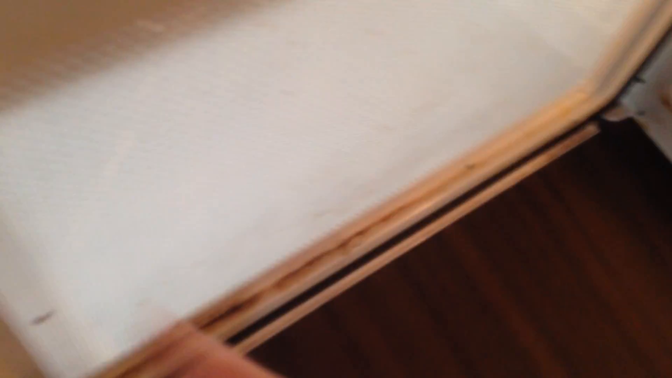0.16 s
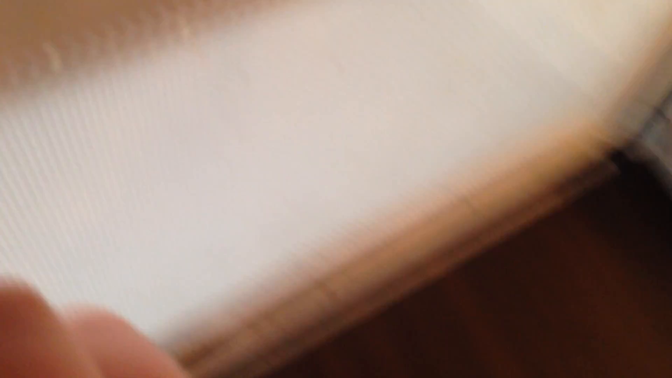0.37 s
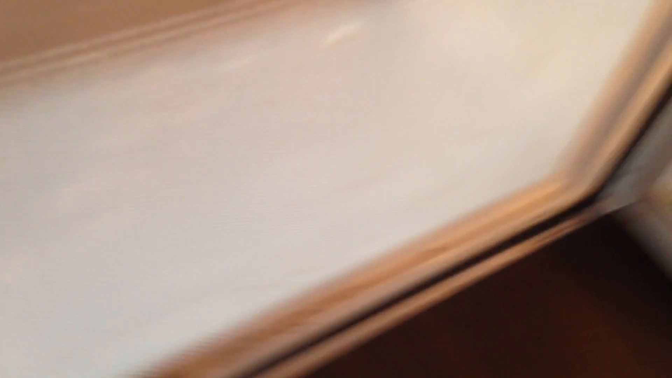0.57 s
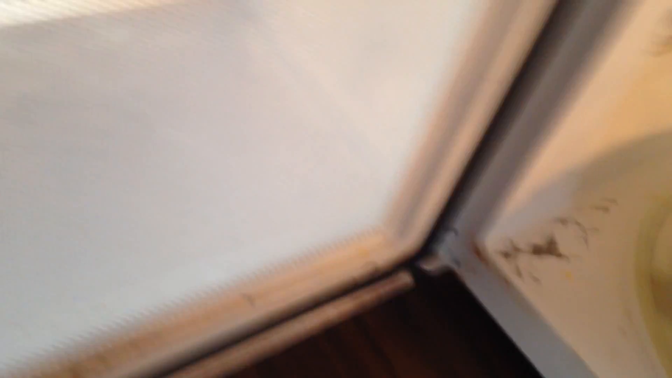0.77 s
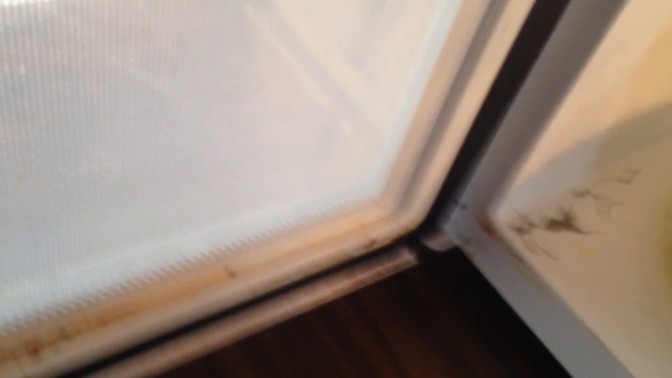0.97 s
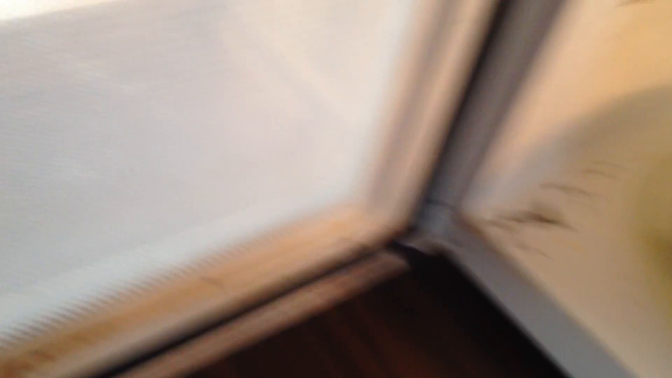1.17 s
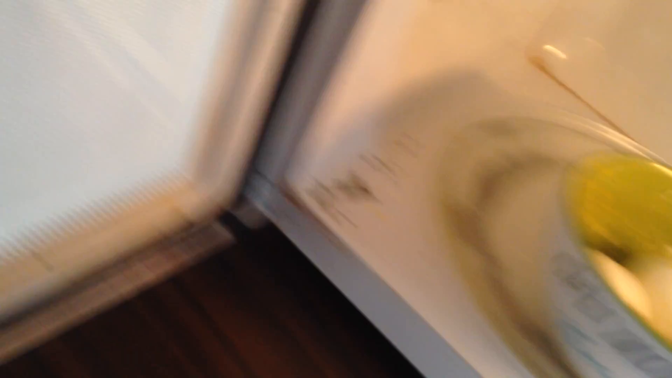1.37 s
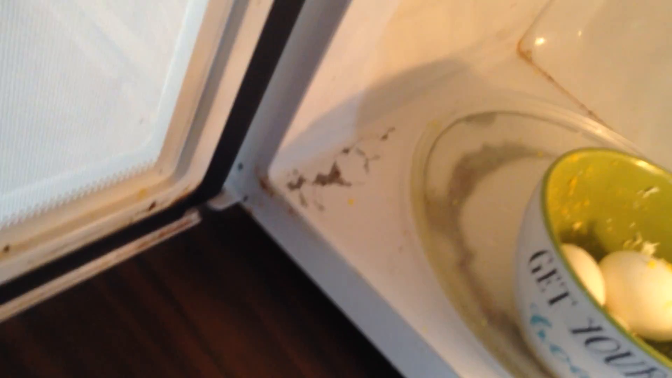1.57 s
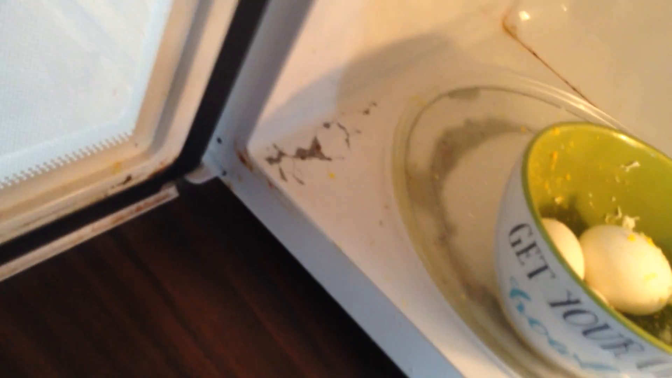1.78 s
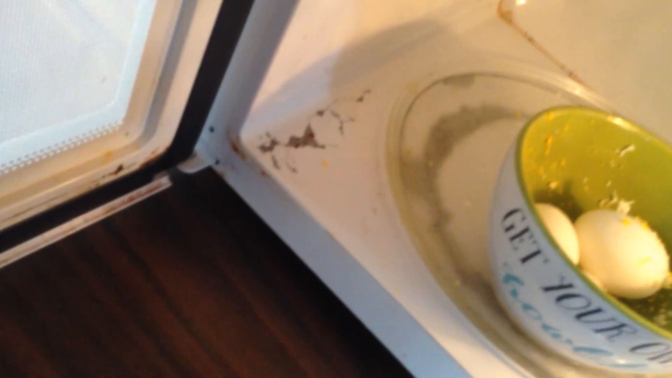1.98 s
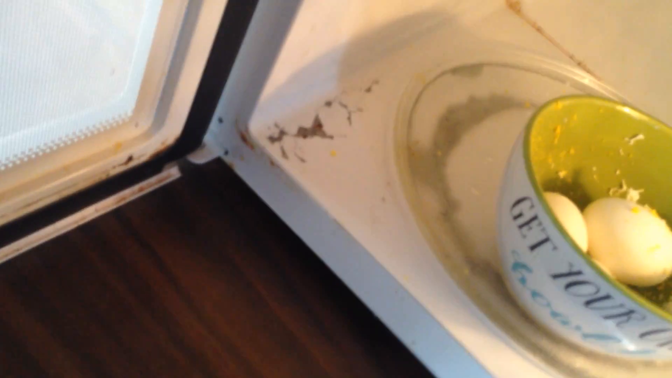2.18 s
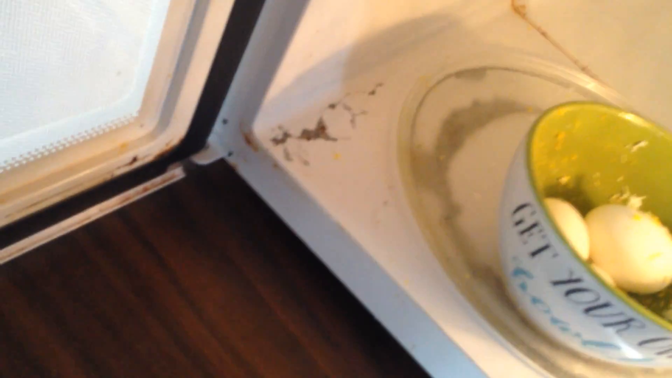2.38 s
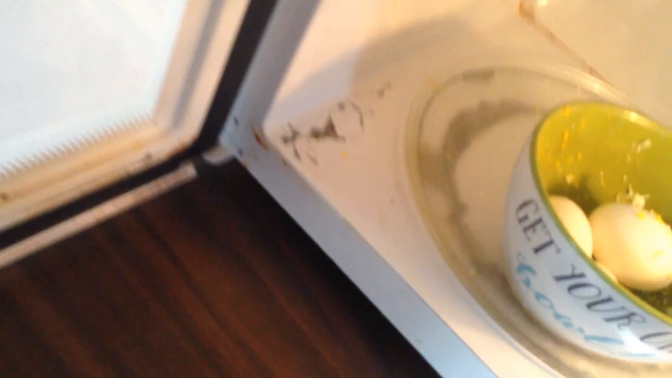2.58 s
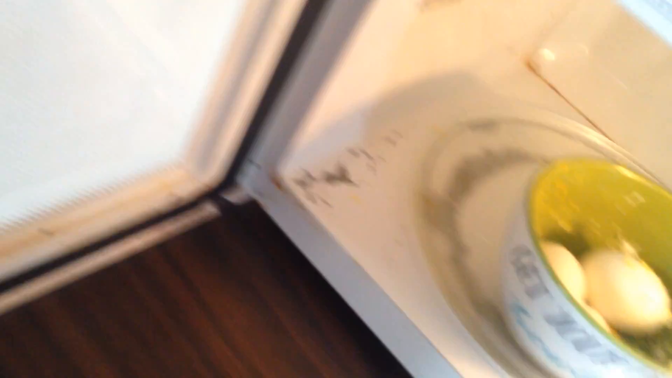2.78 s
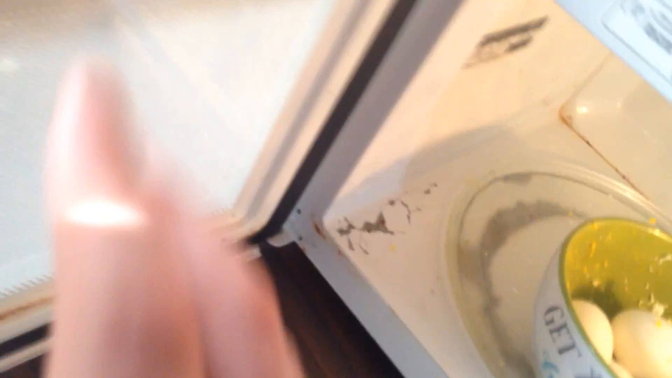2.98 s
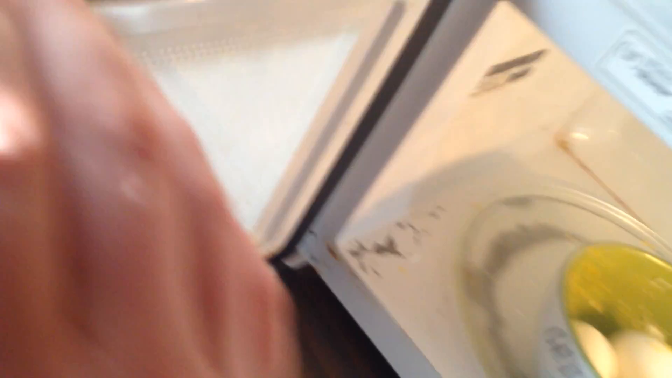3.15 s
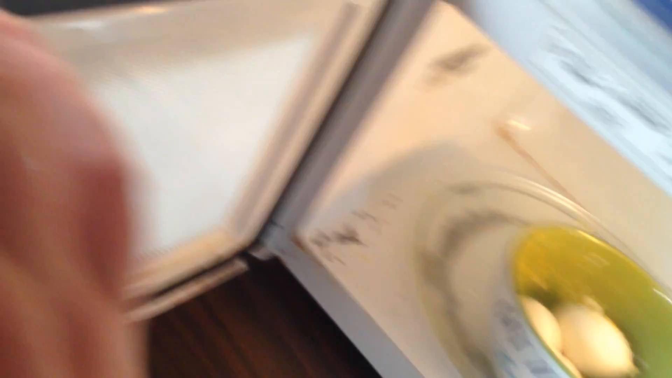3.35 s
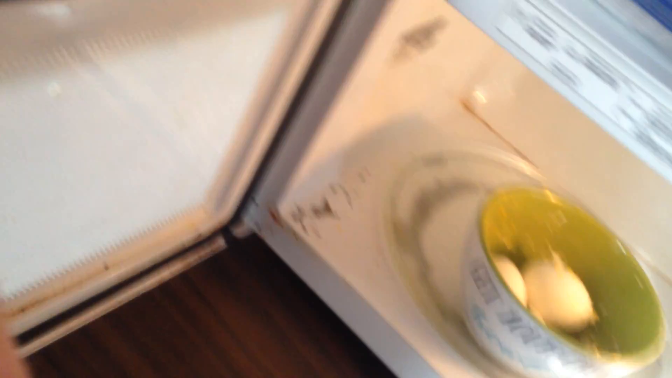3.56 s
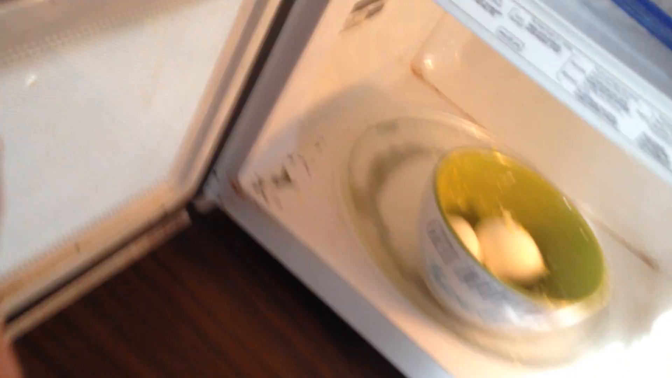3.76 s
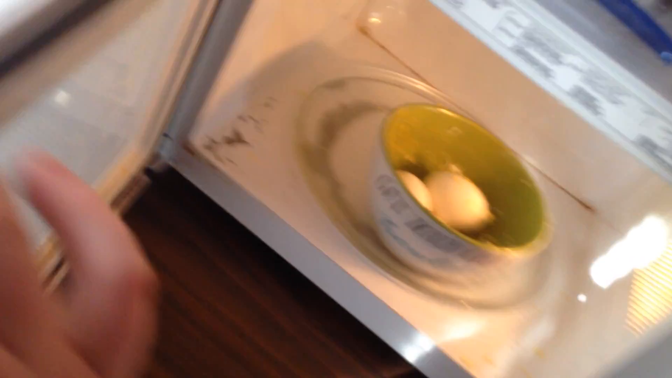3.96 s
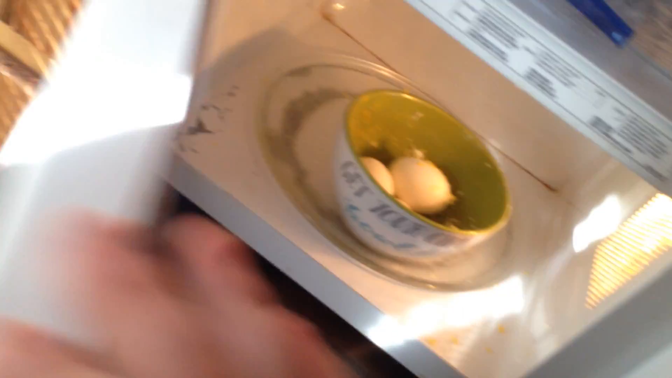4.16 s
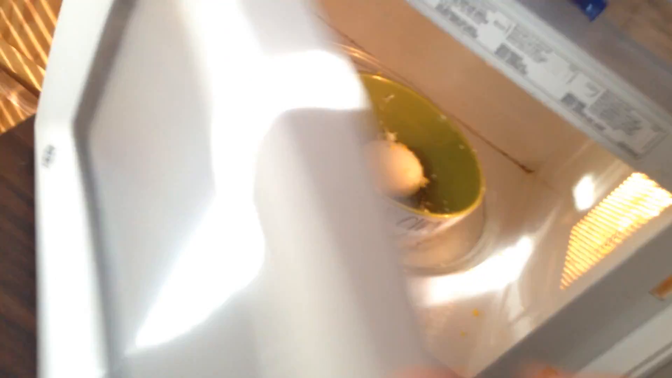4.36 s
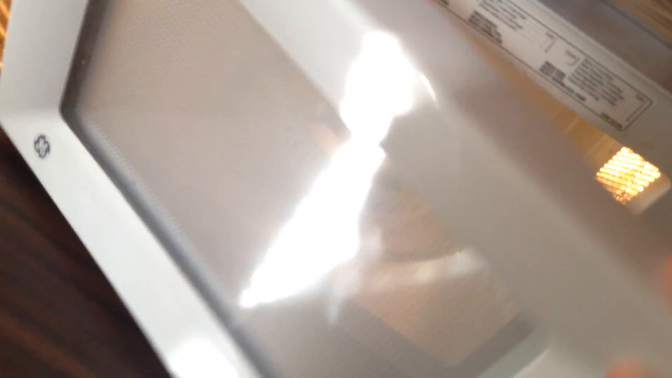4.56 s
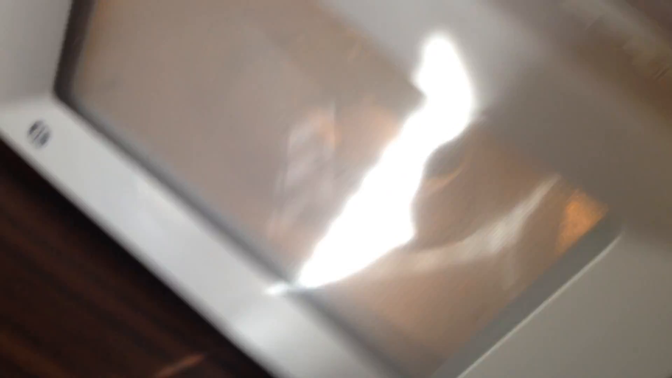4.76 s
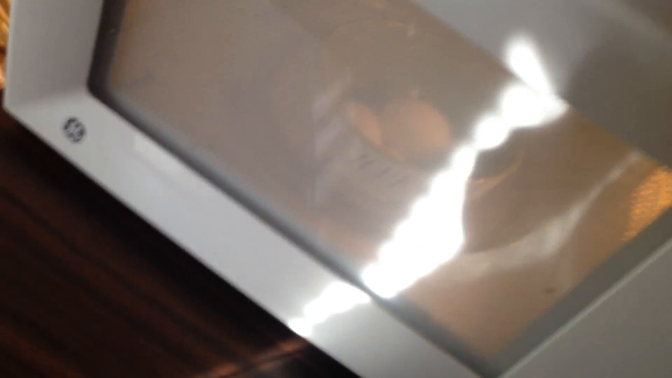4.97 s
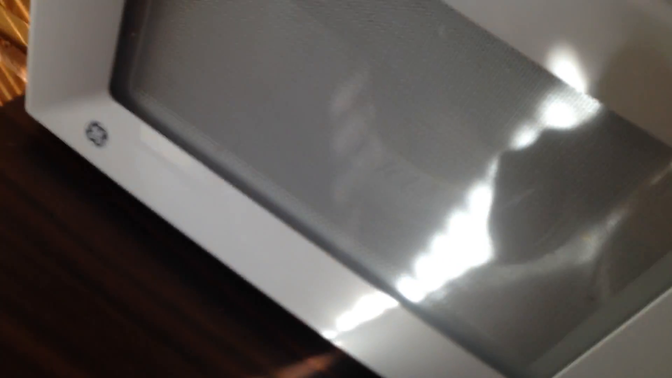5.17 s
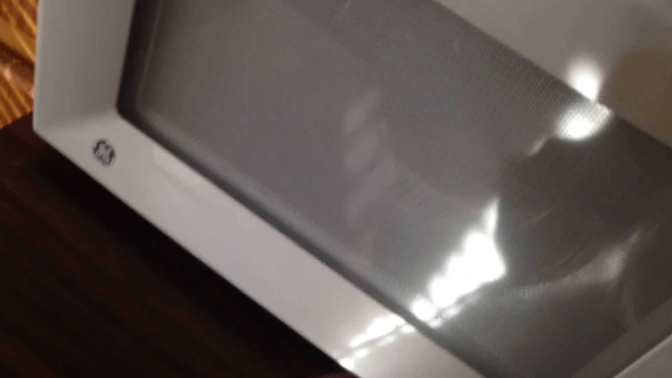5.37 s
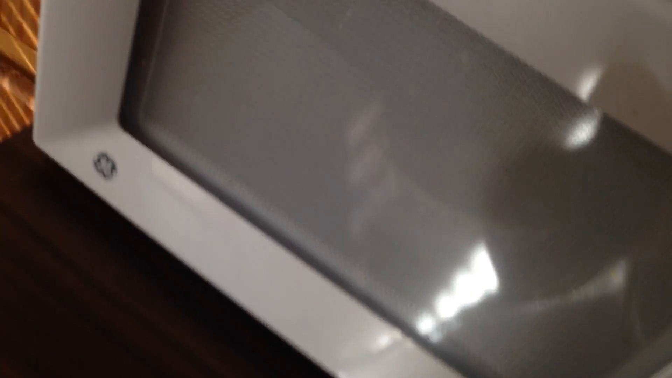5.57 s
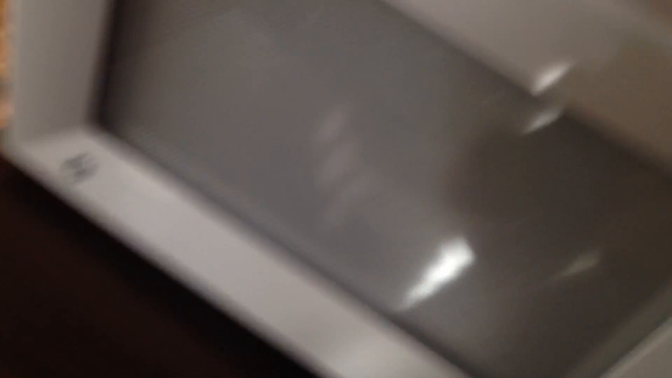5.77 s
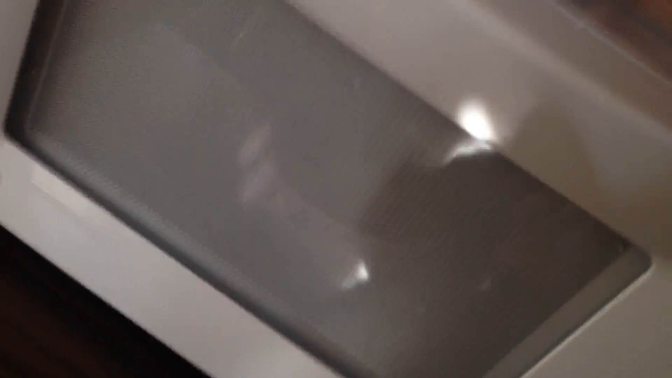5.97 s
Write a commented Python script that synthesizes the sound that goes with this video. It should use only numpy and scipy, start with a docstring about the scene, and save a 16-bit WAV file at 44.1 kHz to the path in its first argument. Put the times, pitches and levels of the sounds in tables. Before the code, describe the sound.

A quiet kitchen with a faint low rumble and hiss, heard from close to an open microwave. At about 0.4 seconds the door gives light plastic clicks and a hollow knock, with another small cluster of clicks at 0.8. After a lull, tiny taps come at 2.3 and 2.6 seconds. From there to about 4.1 a faint dull patter comes and goes. A hand brushes the plastic around 3 seconds and bumps it softly at 3.2, and a click with a light hollow knock follows at 4.2. Near 5 seconds the door meets the frame with a click, low bumps and a slight rub. At 5.2 the latch snaps home in a quick rattle of impacts, making one loud, sharp slam, and the metal case rings low, fading within about a second. Faint bumps and ticks follow at 5.5 and around 6 seconds.

```python
"""In a quiet kitchen a microwave oven stands open. Light taps excite the modes of plastic parts, knocks
ring a hollow body, and a hand bumps and brushes the door, its friction giving a grainy hiss. The latch
hooks touch the frame, ride up their ramps and snap home in a series of impacts: the door slams and
the sheet-metal case rings briefly in free, damped vibration. Under it all lie a faint dull patter,
weak reflections from the walls and a low rumble and hiss."""
import sys
import numpy as np
from scipy import signal
from scipy.fft import rfft, irfft, next_fast_len
from scipy.io import wavfile

SR = 44100
rng = np.random.default_rng(int(sys.argv[2]) if len(sys.argv) > 2 else 0)


def master_out(mix):
    """Clip the mix to full scale and print it as 16-bit PCM to the path in sys.argv[1]."""
    frames = np.transpose(np.atleast_2d(mix))
    ceiling = np.clip(frames, -1, 1)
    pcm = np.round(ceiling * 32767).astype(np.int16)
    wavfile.write(sys.argv[1], SR, pcm)


N = 266187
TIME = np.arange(N) / SR
AGE = np.arange(2 ** 15) / SR   # time since the onset of one event [s]

# Levels in the tables are relative. The hooks touch, ride up and snap home, then the door settles:
# (time [s], push [dB], crack [dB], crack's upper edge [Hz], rebound gap [s], push loss per rebound [dB])
LATCH_IMPACTS = [(4.9620, -25.5, -35, 7140, 0.023, 0), (5.142, -32.5, -47.5, 1505, 0.0057, 13),
                 (5.1568, -31.5, -33, 4500, 0.0067, 7), (5.1750, -28.5, -37, 11700, 0.006, 1),
                 (5.1838, -20, -24.5, 14500, 0.0072, 9), (5.1889, -0.5, -16, 15100, .0061, 9),
                 (5.1935, -15.5, -17.5, 14200, 0.006, 5), (5.2454, -27, -32.5, 2500, .007, -2.5)]
# modes of steel case, cavity and door: (frequency [Hz], level [dB], T60 [s])
CASE_MODES = [(71.7, -39.5, 0.85), (105.2, -17.5, 0.25), (129.9, -18, 0.32), (172, -37, 0.084),
              (188.8, -35, 0.31), (228.4, -43.5, 1.1), (243, -22.5, 0.38), (271, -42.5, 1.66),
              (268.3, -18.5, 0.38), (280, -57.5, 1.4), (301, -27.5, 0.34), (338, -46, 0.73),
              (349.4, -22.5, 0.27), (357, -48, 0.72), (414, -27, 0.15), (469, -25.5, 0.19),
              (521, -30.5, 0.22), (538, -60.5, 1.8), (730, -19, 0.11), (780, -40.5, 0.22), (844, -43, 0.21),
              (945, -31.5, 0.11), (940, -65.5, 1.1), (1326, -26.5, 0.14), (2510, -35.5, 0.17),
              (2910, -33, .1), (4520, -35, .09), (6340, -42, .1), (8170, -13, 0.011)]
# spectrum of the crowd of small panel modes: (frequency [Hz], spectral level [dB])
PANEL_SPECTRUM = [(100, -0.5), (350, 8.5), (750, 2.5), (1150, -4.5), (1600, -1), (2000, -3.5), (3000, -4.5),
                  (5000, -9.5), (7000, -12.5), (8400, -12.5), (10500, -16), (13000, -13.5), (15000, -14)]
# decay of those modes: (frequency [Hz], T60 [s])
PANEL_DECAY = [(100, 0.77), (400, 0.27), (1000, 0.25), (2500, 0.16), (6000, .17), (15000, 0.044)]
# murmur of the hollow cavity after a blow: (frequency [Hz], spectral level [dB])
CAVITY_SPECTRUM = [(110, -27), (180, -1.5), (300, 3.5), (400, -16), (520, -3.5), (700, -16), (1500, -40.5)]
# light clicks and taps of plastic: (time [s], level [dB], lower edge [Hz], upper edge [Hz])
PLASTIC_TAPS = [(.3540, -48, 880, 1250), (0.435, -44, 740, 4420), (.4420, -36, 560, 990),
                (0.806, -42.5, 420, 7140), (.8230, -45.5, 415, 760), (0.8369, -40, 407, 5530),
                (2.3215, -50.5, 330, 1400), (2.5750, -50.5, 280, 2850), (3.217, -48, 1540, 5130),
                (3.245, -47.5, 504, 865), (3.6872, -55.5, 606, 3000), (4.1375, -44.5, 1900, 14000),
                (4.1815, -39.5, 750, 1300), (4.2230, -50, 490, 2000), (4.786, -57.5, 294, 2510),
                (5.4614, -54, 1300, 4050), (5.846, -56.5, 399, 11030), (5.9570, -48, 470, 816),
                (6.0104, -49, 345, 2010)]
# modes of the plastic parts: (frequency [Hz], level [dB], T60 [s])
PLASTIC_MODES = [(437, -3, 0.17), (595, -10, 0.11), (1049, -12, 0.14), (1550, -9.5, 0.12),
                 (2117, -2.5, 0.081), (2810, -4.5, 0.077), (3440, -8.5, 0.033), (4130, -16, 0.24)]
# knocks on a hollow body: (time [s], level [dB])
HOLLOW_KNOCKS = [(0.4362, -36.5), (0.4560, -42), (0.809, -67), (0.8375, -65), (4.1828, -51)]
# modes of that body: (frequency [Hz], level [dB], T60 [s])
HOLLOW_MODES = [(125, -11, 0.57), (167.7, -17, 0.44), (224, -1.5, 0.32), (314, -6.5, 0.16),
                (339, 0.5, 0.073), (435, -12.5, 0.13), (650, 6, 0.027), (820, -8, 0.057),
                (853, -4.5, 0.036), (880, -4, .06), (1250, -44, .08)]
# soft bumps of hand and door: (time [s], level [dB], frequency [Hz])
SOFT_BUMPS = [(3.160, -39, 125), (3.233, -27, 126), (3.690, -43, 72), (4.19, -35.5, 137),
              (4.9602, -29.5, 78), (4.9962, -26.5, 115.7), (5.0206, -24, 115), (5.526, -39.5, 108),
              (5.954, -39.5, 125)]
# runs of faint patter: (start [s], end [s], first knock [dB], following knocks [dB])
PATTER_RUNS = [(2.579, 2.72, -55, -62.5), (2.889, 2.95, -60, -56.5), (3.545, 3.67, -56.5, -56.5),
               (3.810, 3.86, -49, -56), (3.892, 4.02, -52, -57), (4.044, 4.09, -56.5, -88),
               (4.103, 4.15, -53, -55.5)]
# dull colour of the patter: (frequency [Hz], spectral level [dB])
PATTER_SPECTRUM = [(150, -50), (240, -3), (330, 5), (430, -6.5), (560, -9.5), (830, -8.5), (1200, -22.5),
                   (3000, -31), (9000, -45)]
# skin rubbing on plastic: (start [s], end [s], level [dB], frequency that places the band [Hz])
RUB_STROKES = [(0.121, 0.60, -71, 6000), (0.343, 0.398, -58, 1180), (1.151, 1.65, -73.5, 345),
               (2.947, 3.082, -61, 1860), (3.161, 3.24, -56.5, 1570), (3.611, 3.697, -69, 1757),
               (4.135, 4.192, -57.5, 650), (4.801, 5.023, -64.5, 1040), (4.938, 5.155, -60, 1047),
               (5.499, 5.544, -62, 1240), (5.881, 5.94, -65.5, 1150)]
# rumble and hiss of the still room: (frequency [Hz], spectral level [dB])
ROOM_SPECTRUM = [(15, -44), (25, -19), (40, -9.5), (60, -2.5), (100, -6.5), (150, -11), (250, -10.5),
                 (400, -14), (700, -18), (1200, -23.5), (4000, -21.5), (8000, -23), (15000, -24.5)]
# envelope of a drifting low rumble: (time [s], level [dB])
RUMBLE_ENVELOPE = [(0.0, -65.5), (0.49, -60.5), (0.68, -71), (1.19, -64), (1.66, -77.5), (2.97, -67.5),
                   (3.4, -66), (4.39, -70), (4.9, -79)]


def door(softest_hz=135, hardening_hz=9000, thud_db=-11, cavity_db=-50, cavity_t60=1.0):
    """Impact excitation: each contact thuds, cracks in the plastic and drives the case and cavity."""
    pushes, out = np.zeros(N), np.zeros(N)
    lead_s = .008   # room for the thud's leading shoulder
    for s, push_db, crack_db, edge_hz in latch_contacts():
        force = from_db(push_db)
        # a gentle push lasts longer and reaches only the low modes
        add(pushes, s, -force * band((AGE == 0) + 1e-18, 20, softest_hz + hardening_hz * force ** 2))
        add(out, s - lead_s, -force * from_db(thud_db) * thud(width_s=0.0015, delay_s=lead_s + 0.00073))
        dense = band(noise(PANEL_SPECTRUM, len(AGE)), 120, edge_hz)
        crack = panel_burst(dense, crack_t60=0.047, tail_db=-10, spread_s=0.00093)
        add(out, s, from_db(crack_db) * crack)
        murmur = noise(CAVITY_SPECTRUM, len(AGE)) * fade(cavity_t60)
        add(out, s, force * from_db(cavity_db) * murmur)
    # neighbouring modes bulge in opposite directions
    return ring(pushes, CASE_MODES[::2]) - ring(pushes, CASE_MODES[1::2]) + out


def latch_contacts(crack_loss_db=10):
    """Contact chatter: door and frame meet and rebound twice, the crack weaker each time."""
    return [(s + k * gap_s, push_db - k * push_loss_db, crack_db - k * crack_loss_db, edge_hz)
            for s, push_db, crack_db, edge_hz, gap_s, push_loss_db in LATCH_IMPACTS for k in range(3)]


def thud(width_s, delay_s):
    """Acceleration noise: a mass stopped short radiates one pressure swing between two shoulders."""
    u = (AGE - delay_s) / width_s
    return (1 - u ** 2) * np.exp(-u ** 2 / 2)


def ring(force, modes):
    """Modal superposition of damped resonators; the air follows their velocity, so deep bass is lost."""
    out = np.zeros(len(force))
    for hz, db, t60 in modes:
        radius, angle = from_db(-60 / (t60 * SR)), 2 * np.pi * hz / SR
        feedback = [1, -2 * radius * np.cos(angle), radius ** 2]
        out += from_db(db) * signal.lfilter([.5, 0, -.5], feedback, force + 1e-18)
    return out


def panel_burst(dense, crack_t60, tail_db, spread_s, sustain=1):
    """High modal density: a noisy crack builds as it spreads, then a tail loses its treble first."""
    centres = np.geomspace(100, 16000, num=8)
    hz, spectrum, tail = np.fft.rfftfreq(len(AGE), 1 / SR), rfft(dense), 0
    for centre, share in zip(centres, np.eye(len(centres))):
        subband = irfft(spectrum * at_hz(np.c_[centres, share], hz))
        tail = tail + subband * fade(sustain * at_hz(PANEL_DECAY, centre))
    build_up = 1 - np.exp(-AGE / spread_s)
    return (dense * fade(crack_t60) + from_db(tail_db) * tail) * build_up


def taps(ring_db=-14):
    """Band-limited excitation: each light contact rings its own band of the plastic's modes."""
    out = np.zeros(N)
    tone = from_db(ring_db) * ring(AGE == 0, PLASTIC_MODES)
    for s, db, low_hz, high_hz in tap_contacts():
        dense = band(noise(PANEL_SPECTRUM, len(AGE)), low_hz, high_hz, order=3)
        crack = panel_burst(dense, crack_t60=0.025, tail_db=-9.5, spread_s=0.0012, sustain=0.72)
        click = crack + band(tone, low_hz, high_hz, order=3)
        add(out, s, from_db(db) * click / np.std(dense))
    return out


def tap_contacts(seat_s=.0043, edge_share=0.58, firm_db=-42.5, loss_per_db=5.1):
    """Double impact: an edge clicks, then the part seats more dully, far weaker after a light tap."""
    seats = []
    for s, db, low_hz, high_hz in PLASTIC_TAPS:
        seat_db = db - loss_per_db * max(firm_db - db, 0)
        seats.append((s + seat_s, seat_db, low_hz, max(low_hz, high_hz * edge_share)))
    return list(PLASTIC_TAPS) + seats


def knocks():
    """Impulse response: blunt knocks leave a hollow body ringing in its low modes."""
    impulses = np.zeros(N)
    for s, db in HOLLOW_KNOCKS:
        add(impulses, s, -from_db([db]))
    return band(ring(impulses, HOLLOW_MODES), 37, 1400)


def bumps(settle_s=0.029, settle_loss_db=9.5):
    """Heavy damping: a soft hand gives only a cycle or two of bass, then a weaker settling bump."""
    out = np.zeros(N)
    for s, db, hz in SOFT_BUMPS:
        swing = np.sin(2 * np.pi * hz * AGE) * (fade(0.028) - fade(0.01026))
        swing *= 0.5 / swing.max()
        add(out, s, from_db(db) * swing)
        add(out, s + settle_s, from_db(db - settle_loss_db) * swing)
    return out


def patter(gap_s=.035, jitter_s=0.00102):
    """Overlapping decays: dull little knocks at a nearly even pace blur into one another."""
    contacts, out = [], np.zeros(N)
    for start, end, first_db, following_db in PATTER_RUNS:
        contacts.append((start, first_db))
        for s in np.arange(start + gap_s, end, gap_s):
            contacts.append((s + jitter_s * rng.standard_normal(), following_db))
    decay = fade(0.17) + from_db(-16.5) * fade(1.0)
    for s, db in contacts:
        add(out, s, from_db(db) * noise(PATTER_SPECTRUM, len(AGE)) * decay)
    return out


def rubs(grain_db=1.0, grain_hz=250):
    """Sliding friction: skin on plastic gives a grainy hiss that swells and lets go."""
    out = np.zeros(N)
    for start, end, db, hz in RUB_STROKES:
        grip, white = rng.standard_normal((2, len(AGE)))
        grain = from_db(grain_db * rms_one(band(grip, 20, grain_hz)))
        hiss = rms_one(band(white * grain, hz * 0.056, hz * 1.77))
        swell = np.sin(np.pi * np.clip(AGE / (end - start), 0, 1))
        add(out, start, from_db(db) * hiss * swell)
    return out


def kitchen_reflections(direct, t60=0.29, wall_hz=2500, gap_s=0.002, level_db=-27):
    """Reverberation: diffuse reflections from cupboards and walls die away exponentially."""
    echoes = band(rng.standard_normal(len(AGE)), 150, wall_hz) * fade(t60) * (AGE > gap_s)
    echoes /= np.sqrt(np.sum(echoes ** 2))
    return from_db(level_db) * signal.fftconvolve(direct, echoes)[:N]


def room_tone(level_db=-65.5):
    """Stationary noise: the rumble and hiss of the still room."""
    return from_db(level_db) * noise(ROOM_SPECTRUM, next_fast_len(N))[:N]


def low_rumble():
    """Amplitude modulation: an octave of bass noise slowly rises and falls."""
    envelope = from_db(np.interp(TIME, *np.transpose(RUMBLE_ENVELOPE)))
    return envelope * rms_one(band(rng.standard_normal(N), 50, 100, order=3))


def from_db(db):
    """Decibels to amplitude ratio."""
    return 10 ** (np.asarray(db) / 20)


def rms_one(x):
    """Normalisation to unit rms."""
    return x / np.sqrt(np.mean(x ** 2) + 1e-20)


def at_hz(points, hz):
    """Interpolation on a log-frequency axis."""
    frequencies, values = np.transpose(points)
    return np.interp(np.log(np.maximum(hz, 1)), np.log(frequencies), values)


def add(out, s, sound):
    """Superposition of a sound starting at s seconds."""
    at = round(s * SR)
    out[at:at + len(sound)] += sound[:N - at]


def band(x, low_hz, high_hz, order=2):
    """Band limiting by causal high-pass and low-pass filters."""
    for hz, kind in ((low_hz, "high"), (high_hz, "low")):
        x = signal.sosfilt(signal.butter(order, min(hz, SR / 2 - 1000), kind, fs=SR, output="sos"), x)
    return x


def noise(spectrum, size):
    """Spectral shaping of white noise, at unit rms."""
    gain = from_db(at_hz(spectrum, np.fft.rfftfreq(size, 1 / SR)))
    return rms_one(irfft(rfft(rng.standard_normal(size)) * gain, size))


def fade(t60):
    """Exponential decay, by 60 dB in t60 seconds."""
    return np.exp(-np.log(1000) * AGE / t60)


def scene():
    """Linear superposition of direct sound, reflections and background, in one channel."""
    direct = door() + taps() + knocks() + bumps() + patter() + rubs()
    return (direct + kitchen_reflections(direct) + room_tone() + low_rumble())[None]


def record(dry, cutoff_hz=15400):
    """Low-pass filtering: the highest treble is cut steeply."""
    return signal.sosfilt(signal.ellip(12, .1, 80, cutoff_hz, fs=SR, output="sos"), dry)


dry = scene()
out = record(dry)
master_out(out)
```